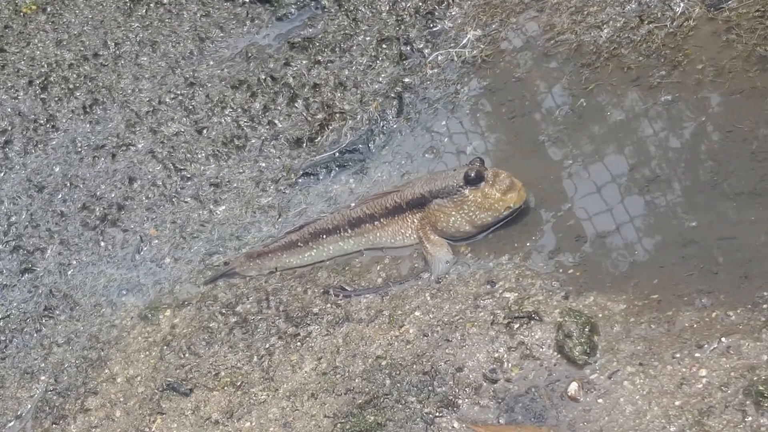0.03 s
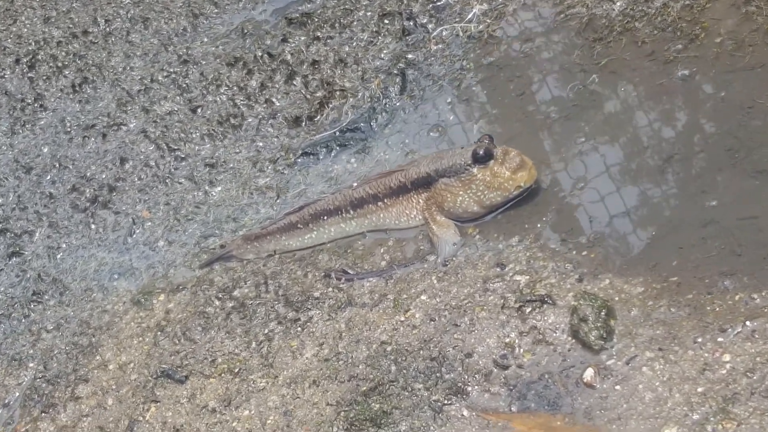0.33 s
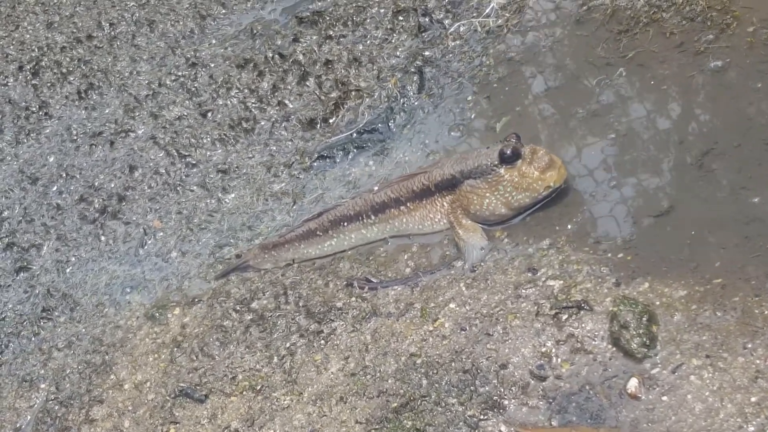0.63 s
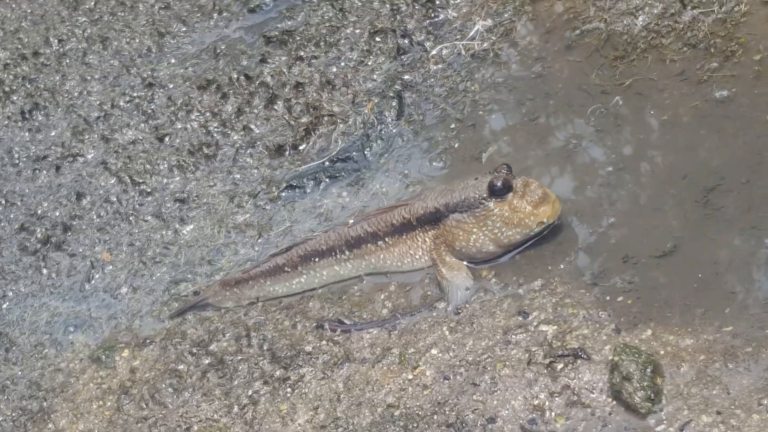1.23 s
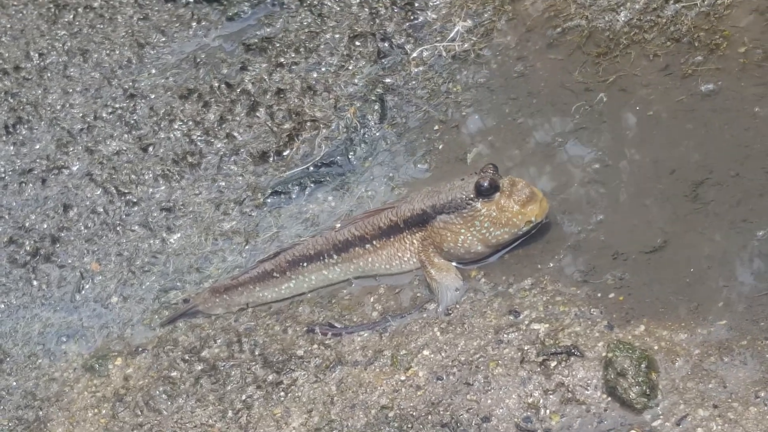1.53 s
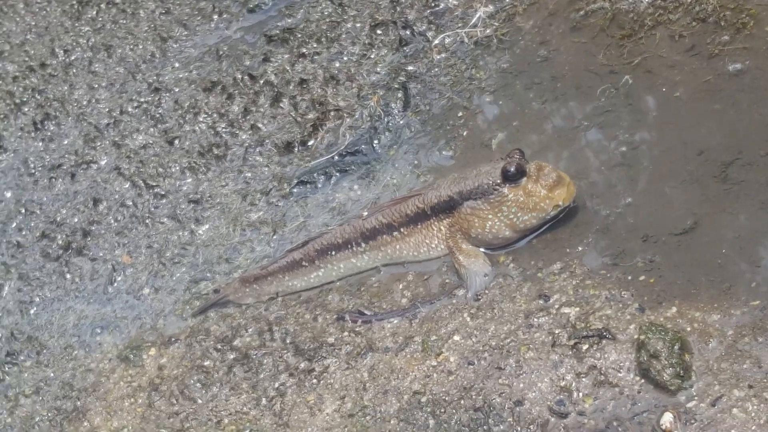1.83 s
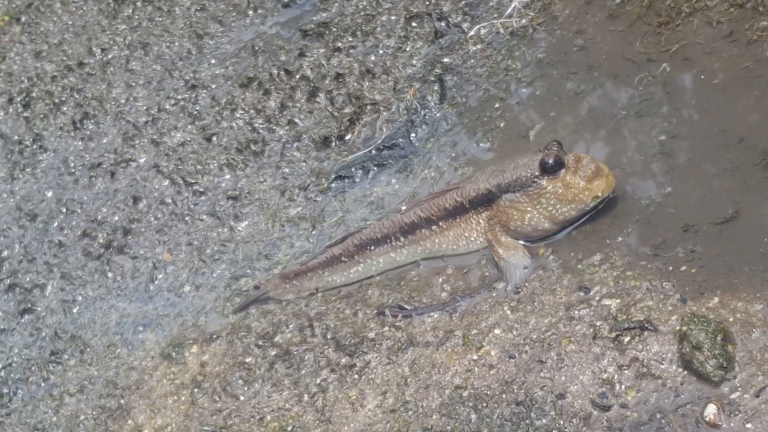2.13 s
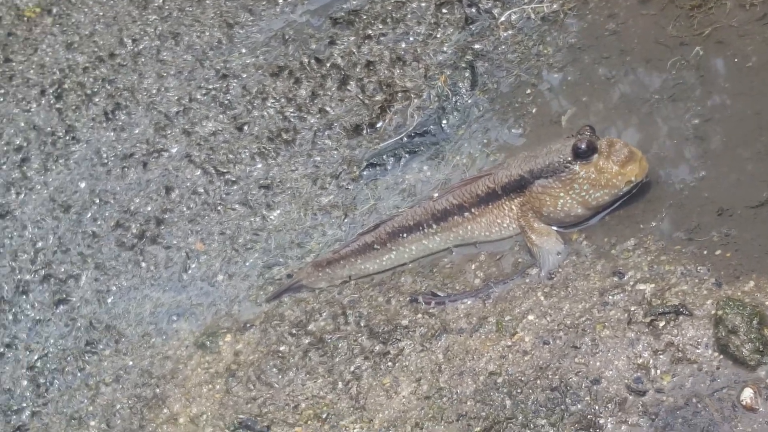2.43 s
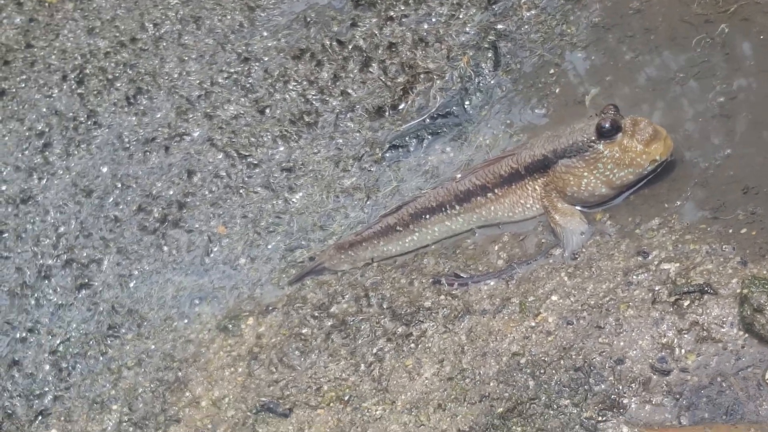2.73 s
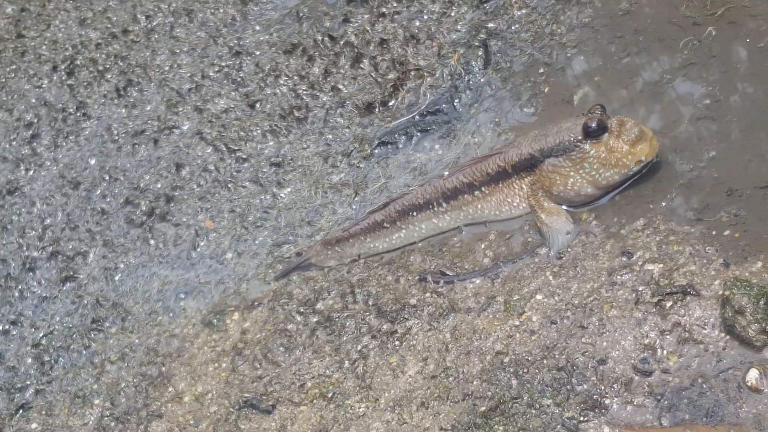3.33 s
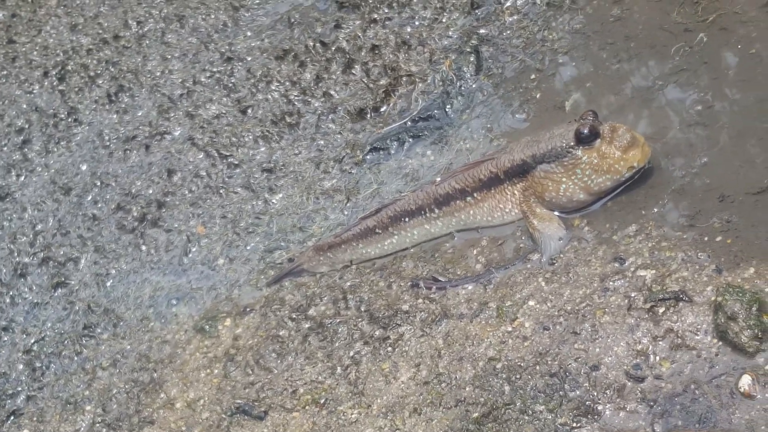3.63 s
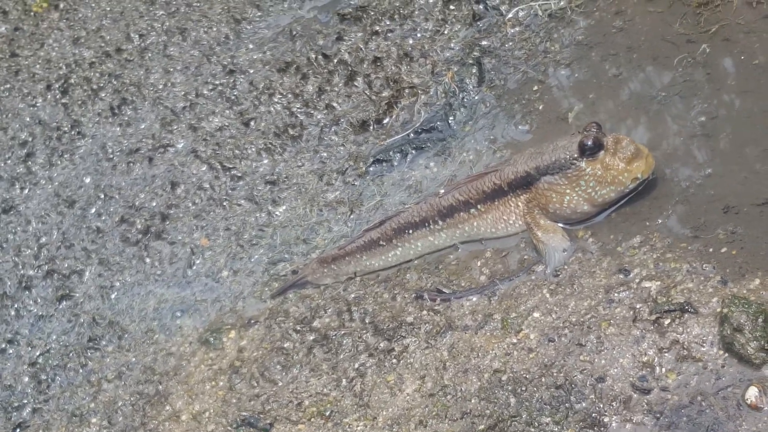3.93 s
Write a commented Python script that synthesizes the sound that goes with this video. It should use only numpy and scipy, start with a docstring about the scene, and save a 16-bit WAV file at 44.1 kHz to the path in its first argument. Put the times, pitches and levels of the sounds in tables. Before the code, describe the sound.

A constant high insect drone and hiss, with one brief, light splash and distant bird chirps.

```python
"""Insects on a hot, muddy shore

Far insects drone near 3 kHz, others hiss near 12 kHz, and a near one repeats a falling note.
Something small splashes through the shallows: bubbles ring, drops hit the mud and spray patters.
Distant birds chip and a faint cricket trills, over a low rumble, soft air and a thin whine."""
import sys
import numpy as np
from scipy import signal
from scipy.fft import rfft, irfft, next_fast_len
from scipy.io import wavfile
from scipy.ndimage import uniform_filter1d, map_coordinates

SR = 44100
rng = np.random.default_rng(int(sys.argv[2]) if len(sys.argv) > 2 else 0)


def unload_wav(signal):
    """Save mono or channel-first audio to the path in sys.argv[1] as 16-bit WAV at rate SR, clipped to [-1, 1]."""
    wavfile.write(
        sys.argv[1],
        SR,
        np.round(np.clip(np.atleast_2d(signal).T, -1, 1) * 32767).astype(np.int16),
    )


N = 4 * SR

# Loudness of the insect groups: time_s, drone_db, overtones_db, hiss_db, joiner_db
INSECT_LEVELS = [(0, -54.5, -60, -56.5, -91), (2.1, -53, -60.5, -58.5, -60.5),
                 (3.1, -51.5, -59, -55.5, -59), (4, -51, -58, -57.5, -52.5)]


def amp(db):
    """Turn decibels into a gain."""
    return 10 ** (np.asarray(db) / 20)


def unit(x):
    """Scale x to an average power of 1."""
    return x / np.sqrt(np.mean(x ** 2) + 1e-20)


def along(points, hz):
    """Read between (pitch_hz, value) points on a log pitch scale."""
    f, v = np.transpose(points)
    return np.interp(np.log(hz + 1), np.log(f + 1), v)


def curves(rows):
    """Give each column after the time one value per sample."""
    s, *cols = np.transpose(rows)
    return [np.interp(np.arange(N) / SR, s, c) for c in cols]


def wobble(rate):
    """A smooth curve through `rate` random values a second."""
    return map_coordinates(rng.standard_normal(int(N * rate / SR) + 4), [np.arange(N) * rate / SR])


def tone(hz):
    """A sine wave that follows a changing pitch."""
    return np.sin(2 * np.pi * np.cumsum(hz) / SR)


def filtered(x, response):
    """Multiply each frequency in x by response(hz)."""
    m = next_fast_len(N + SR // 2)
    return irfft(rfft(x, m) * response(np.fft.rfftfreq(m, 1 / SR)), m)[..., :N]


def pan(left_db):
    """Two gains that make the left ear left_db louder than the right."""
    return amp(np.array([[left_db], [-left_db]]) / 2)


def add(out, start_s, x):
    """Mix x into out from start_s on."""
    i = max(0, round(start_s * SR))
    out[..., i:i + x.shape[-1]] += x[..., :N - i]


def noise(spectrum, patchy_db):
    """Stereo noise with randomly louder and softer patches."""
    # How alike the two ears sound: pitch_hz, likeness (1 = the same)
    likeness = [(450, 0.76), (740, 0.21), (1220, 0)]
    cells = signal.stft(rng.standard_normal((2, N)), nperseg=1024)[2]
    patches = uniform_filter1d(rng.standard_normal(cells.shape), size=3, axis=1)
    patches = unit(uniform_filter1d(patches, size=10, axis=2))
    pair = signal.istft(cells * amp(patchy_db * patches), nperseg=1024)[1][:, :N]

    def response(hz):
        width = np.arccos(along(likeness, hz)) / 2
        return amp(along(spectrum, hz)) * [np.cos(width), np.sin(width)]
    mid, side = filtered(pair, response)
    return unit(np.array([mid + side, mid - side]))


def echo(x, fade_s):
    """Banks and trees scatter the sound back; it dies by 60 dB in fade_s."""
    t = np.arange(SR) / SR
    tail = rng.standard_normal((2, SR)) * amp(-60 * t / fade_s)
    return signal.fftconvolve(np.atleast_2d(x), tail / np.linalg.norm(tail[0]), axes=1)[:, :N]


def insect_chorus():
    """Many far insects merge into fluttering bands of noise; one more joins in, growing louder."""
    # Tone colours of the four groups: pitch_hz, relative_db
    drone_colour = [(2400, -29), (2820, -10), (2950, 1.5), (3280, 3), (3450, -2.5), (3600, -14),
                    (4100, -23), (4600, -33)]
    overtone_colour = [(5000, -22), (5650, -7.5), (5890, 0.5), (6200, 0), (7200, -16), (8200, -22),
                       (8850, -9), (9700, -11.5), (10500, -19)]
    hiss_colour = [(10700, -28), (11450, -1), (11680, 4.5), (12650, 8.5), (13100, -0.5), (13550, 1),
                   (14300, -40), (15700, -19)]
    joiner_colour = [(11500, -34), (11900, 4), (12020, 5.5), (12190, 10), (12500, -42)]
    drone_db, overtones_db, hiss_db, joiner_db = curves(INSECT_LEVELS)
    drone = amp(drone_db + 0.56 * wobble(70)) * noise(drone_colour, patchy_db=2.2)
    overtones = amp(overtones_db + 0.48 * wobble(70)) * noise(overtone_colour, patchy_db=2.5)
    hiss = amp(hiss_db + 0.8 * wobble(200)) * noise(hiss_colour, patchy_db=0.5)
    joiner = amp(joiner_db + 0.9 * wobble(120)) * noise(joiner_colour, patchy_db=2.5)
    return drone * pan(-2.1) + overtones * pan(3.7) + hiss * pan(4.9) + joiner * pan(9.9)


def singing_insect(pitch_hz=2950):
    """One insect holds a fine tone, with a weaker one an octave above."""
    hz = pitch_hz + 13 * wobble(90)
    level_db = -62.5 + 2.5 * np.array([wobble(20), wobble(23)])
    return amp(level_db) * (tone(hz) + tone(2 * hz) / 2)


def rumble():
    """A low, far rumble rises and falls unevenly."""
    # Its loudness: time_s, level_db
    levels = [(0, -54), (.7, -57.5), (1.45, -52.5), (1.9, -48.5), (4, -50.5)]
    # Its tone colour: pitch_hz, relative_db
    colour = [(20, -28), (45, -12.5), (62, -4), (78, -1.5), (104, -0.5), (125, -7.5), (280, -21),
              (600, -58)]
    return amp(curves(levels)[0] + 0.24 * wobble(9.47)) * noise(colour, patchy_db=2.0) * pan(-1.4)


def air():
    """The open air makes a soft, even rush."""
    # Its tone colour: pitch_hz, relative_db
    colour = [(60, 2), (350, -3), (600, -7.5), (2000, -14.5), (4000, -18), (7500, -34), (15000, -40)]
    return amp(-58) * noise(colour, patchy_db=1.5)


def whine(pitch_hz=1360):
    """A thin whine holds its pitch on the right."""
    # Its loudness: time_s, level_db
    levels = [(.2, -78), (.9, -91), (1.7, -72), (4, -76)]
    wave = tone(pitch_hz + 0.98 * wobble(13))
    return amp(curves(levels)[0] + 0.71 * wobble(7.2)) * wave * pan(-22.0)


def birds(length_s=0.046, rise_hz=1084, rise_s=0.00461, fall_hz=1426):
    """Short raspy chips arch up and drop in pitch, heard mostly through their echo."""
    # Bird calls: start_s, relative_db, top_hz
    chips = [(0, -65.5, 4760), (1.289, -53, 4775), (1.766, -53, 4700), (2.156, -54.5, 4646),
             (3.272, -65, 5500), (3.476, -52, 4638), (3.913, -51, 4630)]
    out, t = np.zeros(N), np.arange(int(length_s * SR)) / SR
    progress = t / length_s
    below_top_hz = rise_hz * np.exp(-t / rise_s) + fall_hz * progress ** 5
    for start_s, db, top_hz in chips:
        hz = top_hz - below_top_hz + 35 * wobble(500)[:len(t)]
        shape = np.sin(np.pi * progress) * amp(db + 2.7 * wobble(350)[:len(t)])
        add(out, start_s, shape * tone(hz))
    return amp(-1.5) * out + amp(6.5) * echo(out, fade_s=0.59)


def near_insects(near_hz=11950, neighbour_hz=12180, sag_hz_per_s=810):
    """A thin note eases and swells as its pitch sags; a fainter neighbour keeps its own pace."""
    # The near insect's notes: start_s, dip_level_db, left_db
    notes = [(.04, -63, 13), (0.948, -62, 16), (1.85, -63, 1), (2.76, -59.5, 3), (3.669, -60.5, -2)]
    length_s, edge_s, dip_s, swell_db_per_s = 0.511, 0.054, 0.2, 28.5
    neighbour_every_s, neighbour_db = 1.3, -64.5
    out, t = np.zeros((2, N)), np.arange(int(length_s * SR)) / SR
    edges = np.clip(np.minimum(t, length_s - t) / edge_s, 0, 1)
    shape = edges * amp(swell_db_per_s * np.abs(t - dip_s))
    near = [(*note, near_hz) for note in notes]
    neighbour = [(s, neighbour_db, 0, neighbour_hz) for s in np.arange(0, N / SR, neighbour_every_s)]
    for start_s, db, left_db, top_hz in near + neighbour:
        hz = top_hz - sag_hz_per_s * t + 10 * wobble(312)[:len(t)]
        flutter_db = 2.5 * (wobble(30) + np.array([wobble(20), wobble(20)]))[:, :len(t)]
        add(out, start_s, pan(left_db) * amp(db + flutter_db) * shape * tone(hz))
    return out + amp(-3.5) * echo(out, fade_s=1.0)


def drop_ticks(rise_s=0.00049, smack_db=-42, smack_fade_s=0.0037):
    """Drops hit the wet mud: a very short ring and a crisp smack."""
    # Falling drops: start_s, ring_db, pitch_hz, left_db
    drops = [(0.139, -43, 1310, -2), (0.317, -42, 2100, -8), (0.342, -50, 2420, -5),
             (.632, -44.5, 2140, -9), (0.7837, -36.5, 4200, -7), (.8303, -42, 3350, -4),
             (0.846, -31, 4000, -11.5), (0.946, -33, 3800, 2), (1.02, -41, 2280, -6),
             (1.066, -26, 1470, -3), (1.079, -48, 1310, -11), (1.137, -28.5, 3870, -9),
             (1.170, -38, 3430, -17), (1.2348, -34.5, 3450, -11), (1.289, -36, 3302, -4),
             (2.755, -39.5, 2400, 10.5)]
    out, t = np.zeros((2, N)), np.arange(SR // 50) / SR
    shape = (t / rise_s * np.exp(1 - t / rise_s)) ** 2
    for start_s, db, hz, left_db in drops:
        ring = amp(db) * shape * np.sin(2 * np.pi * hz * t)
        band = signal.butter(1, [hz / 2, 1.05 * hz], "band", fs=SR, output="sos")
        smack = unit(signal.sosfilt(band, rng.standard_normal(len(t))))
        smack *= amp(smack_db - 60 * t / smack_fade_s)
        add(out, start_s, pan(left_db) * (ring + smack))
    return out


def cricket(pitch_hz=8500, pair_every_s=0.059, gap_s=0.017, pulse_s=0.0044):
    """A faint cricket on the left ticks in quick pairs of pulses."""
    # Runs of pulses: start_s, end_s, level_db
    trills = [(0.17, .62, -66.5), (2.048, 2.78, -68)]
    out, t = np.zeros(N), np.arange(SR // 20) / SR
    lead_s = 2 * pulse_s
    pair = sum(np.exp(-((t - at) / pulse_s) ** 2) for at in (lead_s, lead_s + gap_s))
    for start_s, end_s, db in trills:
        for s in np.arange(start_s, end_s, pair_every_s):
            add(out, s - lead_s, amp(db) * pair * np.sin(2 * np.pi * (pitch_hz * t + rng.random())))
    return (out + amp(-8) * echo(out, fade_s=0.99)) * pan(16.0)


def bubbles(waver=0.061, mud_flutter_db=2.5):
    """Pockets of air in the mud swell and fade, gliding in pitch as they open or close."""
    # Air pockets: start_s, peak_db, start_hz, glide_per_s (relative), length_s
    pockets = [(0.226, -50, 208.5, -7.5, 0.028), (0.327, -37.5, 1320, 1, 0.0037),
               (0.736, -49.5, 336, 6.5, 0.035), (0.82, -39, 1380, 10, 0.012), (.926, -43, 1130, -11, 0.031),
               (.929, -43, 720, -1, 0.028), (0.966, -44, 761, 12.5, 0.029), (1.017, -37.5, 2980, -7, 0.011),
               (1.024, -42.5, 1065, -6, 0.0081), (1.034, -36, 2090, -15, 0.0097),
               (1.035, -40.5, 860, 10, 0.027), (1.118, -39, 1108, 18.5, 0.025)]
    out = np.zeros(N)
    for start_s, db, start_hz, glide, length_s in pockets:
        t = np.arange(int(length_s * SR)) / SR
        hz = start_hz * np.exp(glide * t + waver * wobble(1240)[:len(t)])
        gain = amp(db + mud_flutter_db * wobble(926)[:len(t)])
        shape = np.sin(np.pi * np.sqrt(t / length_s))
        add(out, start_s, gain * shape * tone(hz))
    return out


def spray(count=2200, typical_hz=2900):
    """A cloud of tiny droplets and bursting bubbles, each ringing for a few cycles."""
    # Its loudness: time_s, level_db
    levels = [(.77, -75), (.85, -54.5), (.9, -57), (.95, -48), (1.005, -51.5), (1.035, -46.5), (1.1, -54),
              (1.17, -50), (1.29, -53.5), (1.45, -69)]
    # Its tone colour: pitch_hz, relative_db
    colour = [(300, -9), (1000, -2), (2000, 1), (3800, 4.5), (5000, 3.5), (8000, -12.5), (15000, -23)]
    start_s, length_s = levels[0][0], levels[-1][0] - levels[0][0]
    when, size, life = rng.random((count, 3)).T[:, :, None]
    hz = np.clip(typical_hz * np.exp(0.732 * rng.standard_normal((count, 1))), 400, 15000)
    samples = np.arange(SR // 100)
    cycles = hz * samples / SR
    strength = amp(14.6 * size ** 3) * np.sqrt(hz)
    rings = strength * np.sin(2 * np.pi * cycles) * np.exp(-cycles / (1 + 4 * life))
    positions = ((start_s + length_s * when) * SR).astype(int) + samples
    cloud = np.bincount(positions.ravel(), rings.ravel(), N)[:N]  # add up all the rings
    cloud = filtered(cloud, lambda f: amp(along(colour, f)))
    return unit(cloud) * np.sqrt(length_s * SR / N) * amp(curves(levels)[0])


def fizz(burst_s=0.005, corner_hz=5100):
    """The finest droplets patter down in short bright bursts."""
    # Bursts of droplets: middle_s, level_db
    bursts = [(0.864, -51), (1.041, -56), (1.18, -49.5), (1.213, -53), (1.251, -51.5), (2.77, -58)]
    t = np.arange(N) / SR
    drops = rng.standard_normal(N) * (rng.random(N) < .08)
    patter = filtered(drops, lambda hz: (hz / corner_hz) ** 3 / (1 + (hz / corner_hz) ** 4))
    return unit(patter) * sum(amp(db) * np.exp(-((t - s) / burst_s) ** 2) for s, db in bursts)


def splash(left_lead_s=0.00029):
    """The water sounds reach the left ear a little earlier and echo briefly."""
    water = fizz() + drop_ticks() + bubbles() * pan(2.41) + spray() * pan(-4.5)
    delay_s = np.array([[-left_lead_s], [left_lead_s]]) / 2
    water = filtered(water, lambda hz: np.exp(-2j * np.pi * hz * delay_s))
    return water + amp(-5.0) * echo(water, fade_s=0.055)


def scene():
    """The whole shore."""
    insects = insect_chorus() + singing_insect() + near_insects() + cricket()
    return insects + birds() + splash() + rumble() + air() + whine()


def record(dry, top_hz=15720):
    """Cut away the very highest treble."""
    return filtered(dry, lambda hz: hz < top_hz)


dry = scene()
out = record(dry)
unload_wav(out)
```